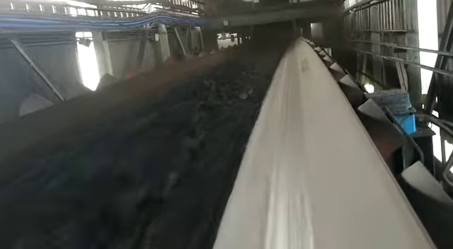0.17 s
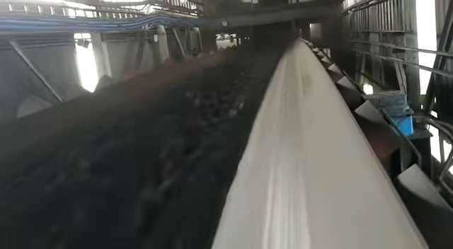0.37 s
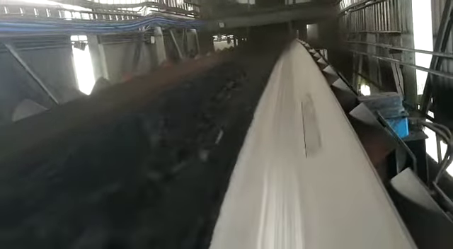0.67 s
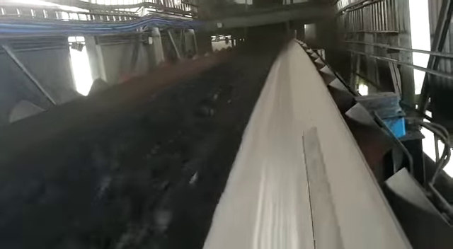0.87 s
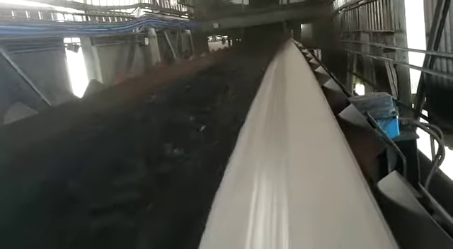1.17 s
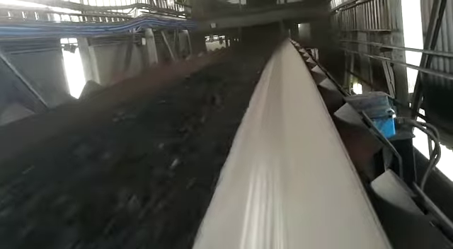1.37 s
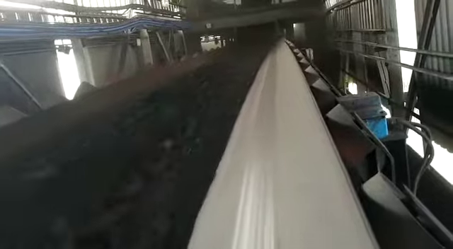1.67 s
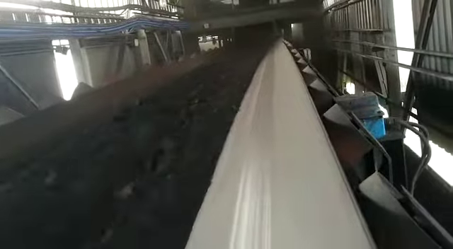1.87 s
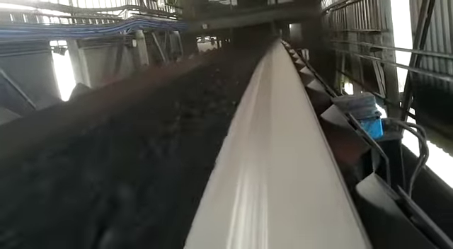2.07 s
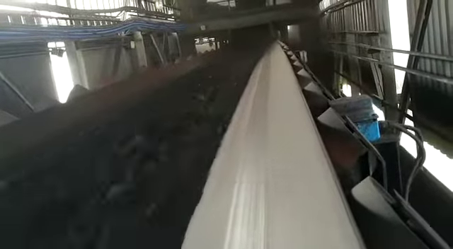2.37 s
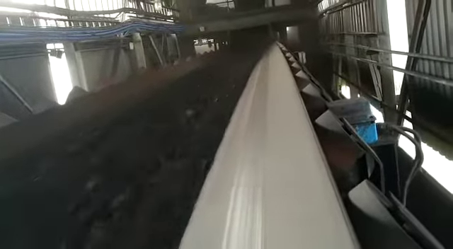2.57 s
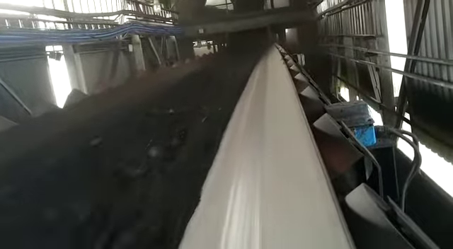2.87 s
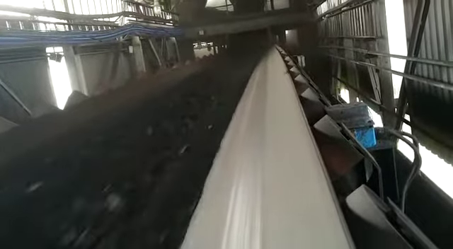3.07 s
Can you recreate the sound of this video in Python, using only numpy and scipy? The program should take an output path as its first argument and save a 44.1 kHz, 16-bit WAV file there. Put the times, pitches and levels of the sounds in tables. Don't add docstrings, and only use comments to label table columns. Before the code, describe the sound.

A dry conveyor roller squeaks in quick regular high chirps over low belt rumble in a steel gallery

```python
import sys
import numpy as np
from scipy import signal
from scipy.io import wavfile
from scipy.ndimage import uniform_filter1d

SR = 44100
rng = np.random.default_rng(int(sys.argv[2]) if len(sys.argv) > 2 else 0)


def volts(x):
    e = np.asarray(x, float) / 20
    return 10 ** e


def int16_out(signal):
    q = np.round(np.clip(np.atleast_2d(signal).T, -1, 1) * 32767)
    wavfile.write(sys.argv[1], SR, q.astype(np.int16))


N = 142002

# frequency in Hz, level in dB per Hz.
RUMBLE_SHAPE = [(12, -47), (20, -29), (81, -4), (177, -2.5), (286, -9), (495, -8), (573, -10),
                (1070, -16.5), (1600, -22), (2080, -35), (3520, -120)]
# frequency in Hz, level in dB per Hz.
HISS_SHAPE = [(1600, -4.5), (2800, 3), (4500, -3), (6800, -8.5), (8300, -45), (9000, -17), (13000, -33),
              (13800, -88)]
# frequency in Hz, likeness from 0 to 1.
STEREO_LIKENESS = [(40, .9998), (80, .999), (170, .99), (350, .75), (700, .56), (1410, 0), (3100, 0)]
# pitch in Hz, level in dB, loudest moment in seconds,
# swell length in seconds, pitch waver in Hz.
DRIVE_HUMS = [(57.2, -39.5, 2.3, 1.6, 0.95), (81.3, -37.5, 2.3, 5.3, 2), (102.6, -30.5, 0.14, 0.6, 2.7),
              (101.8, -31, 2.48, 1.12, 5.5), (121.8, -37, 0.27, 3, 5.57), (144.2, -30, 0.5, 0.35, 6.5),
              (179.2, -25.5, 0.31, 0.7, 5.31), (159.9, -30, 1.82, 1.04, 3.7),
              (193.8, -29.5, 2.28, 2.33, 4.95), (143.2, -35.5, 3, 0.71, 5.94),
              (494.4, -35.5, 0.12, 1.8, 7.4), (489, -33.5, 2.33, 1.28, 8.73), (350.8, -44, 4, 3.9, 14.8)]
# loudest moment in seconds, level in dB, pitch in Hz, length in seconds.
FAR_GROANS = [
    (1.188, -30, 890, 0.033),
    (1.742, -25.5, 922, 0.032),
    (2.114, -29, 976, 0.029),
    (2.682, -27.5, 980, 0.017),
    (3.01, -29.5, 955, 0.04),
    (0.554, -44, 1010, 0.062),
]
# bite in seconds, level in dB, then the 1st, 3rd and 4th partial in dB.
SQUEAKS = [(0.032, -20.0, -10.5, -16.0, -3.0), (0.214, -16.5, -12.0, -14.0, -5.0),
           (0.396, -22.0, -10.5, -15.0, -4.0), (0.578, -19.0, -8.5, -10.0, 4.5),
           (0.763, -14.5, -12.0, -11.5, 0.0), (0.945, -14.5, -13.0, -14.5, -4.5),
           (1.127, -21.5, -13.0, -11.5, -6.0), (1.307, -8.5, -20.5, -14.0, -9.5),
           (1.486, -12.0, -14.5, -11.0, -3.0), (1.672, -18.5, -12.5, -13.5, -4.0),
           (1.856, -19.5, -7.0, -3.0, 2.5), (2.037, -21.0, -7.5, -8.5, -1.0),
           (2.22, -16.5, -15.5, -16.5, -12.0), (2.397, -16.0, -10.0, -6.5, -2.0),
           (2.579, -15.5, -16.5, -15.5, -4.0), (2.764, -21.0, -12.0, -13.0, -7.5),
           (2.949, -20.0, -9.5, -12.5, 2.5), (3.127, -14.5, -16.0, -14.0, -4.0)]
# top partials in dB, pitch in Hz, hold in seconds,
# left over right in dB, roughness from 0 to 1.
SLIPS = [(-39.0, 1900.0, 0.075, 0.0, 0.83), (-29.0, 1895.0, 0.075, 1.0, 0.37),
         (-38.0, 1900.0, 0.065, 0.0, 0.77), (-31.0, 1900.0, 0.065, -2.0, 0.42),
         (-32.0, 1900.0, 0.07, -3.0, 0.45), (-29.0, 1900.0, 0.08, -3.0, 0.48),
         (-35.0, 1900.0, 0.08, 0.0, 0.63), (-26.0, 1902.0, 0.085, -10.0, 0.29),
         (-27.0, 1900.0, 0.085, -3.0, 0.57), (-34.0, 1900.0, 0.07, 2.0, 0.74),
         (-32.0, 1895.0, 0.075, 4.0, 0.59), (-34.0, 1900.0, 0.075, 5.0, 0.79),
         (-35.0, 1900.0, 0.08, 6.0, 0.67), (-26.0, 1875.0, 0.082, 3.0, 0.45),
         (-31.0, 1895.0, 0.08, -0.0, 0.5), (-36.0, 1900.0, 0.08, -3.0, 0.99),
         (-32.0, 1900.0, 0.08, -1.0, 0.58), (-31.0, 1900.0, 0.075, -2.0, 0.54)]
BITE_TIPS = [-56, -45, -51, -37, -40, -47, -44, -38, -38, -45, -41, -50, -44, -38, -42, -49, -42, -49]
LOW_PARTIALS = [5, 0, 13.5, 8]
TOP_PARTIALS = [1, 2.5, 4]
# centre in Hz, width in Hz, level in dB.
RASP_BANDS = [(1940, 300, -39), (3637, 247, 2.5), (5046, 400, -9.5), (5560, 350, -19), (7345, 390, -3.5)]
SHELL_PITCHES = [1800, 1858, 1880, 1950, 3610, 3741, 3807, 3840, 5245, 5566, 5606, 5870, 6165, 7562]
# width in Hz, level in dB.
SHELL_MODES = [(24.4, 25), (16.5, 11.5), (13.3, 8), (40.3, 12), (21.8, -14.5), (20.2, 2), (10.8, 16),
               (14.5, 8), (60, 14), (14.2, 12), (18.5, 5), (50, -0.5), (50.3, 10), (79, -13.5)]
# frequency in Hz, time to fall by 60 dB in seconds.
GALLERY_DECAY = [(1000, .5), (3800, .5), (7500, .42), (9000, .4), (13600, .34), (14400, .05)]

RUMBLE_DB, HISS_DB = -25.5, -37
CLIMB, CLIMB_S, SAG_PER_S = 0.0463, 0.0038, 0.042
WANDER, WANDER_HZ, JITTER, JITTER_HZ = 0.0025, 39.7, 0.029, 384
TOP_STEADY = 0.55
ATTACK_S, RELEASE_S, TIRE_DB_PER_S = 0.012, 0.0016, -66
BITE_S, BITE_RISE_S = 0.016, 0.0069
DRAG_DB, TOP_FADE_DB_PER_S = -18, -190
FLUTTER_DB, FLUTTER_HZ = 4, 80.6
SCRAPE_DB, TIP_S, GRIT_DB = -3.5, 0.0045, -6
DRY_DB, WET_DB, ROLLER_DB = -3, 0, -10.5
EARLY_DB, EARLY_T60_S, FRAME_TOP_HZ = 13, 0.09, 14200
EAR_LAG = 11


def evened(x):
    return x / np.sqrt(np.mean(x ** 2) + 1e-20)


def read(points, hz):
    f, value = np.transpose(points)
    return np.interp(np.log(hz + 1), np.log(f + 1), value)


def resonate(x, hz, width):
    turn = np.exp(2j * np.pi * hz * np.arange(x.shape[-1]) / SR)
    r = np.exp(-np.pi * abs(width) / SR)
    return 2 * (turn * signal.lfilter([1 - r], [1, -r], x / turn)).real


def drift(noise, rate_hz):
    r = np.exp(-2 * np.pi * rate_hz / SR)
    once = signal.lfilter([1 - r], [1, -r], noise)
    return evened(signal.lfilter([1 - r], [1, -r], once))


def wash(shape, level_db, patchy_db, swell_db):
    frames, hz = N // 512 + 5, np.fft.rfftfreq(2048, 1 / SR)
    a, b, c, d, patches = rng.standard_normal((frames, 1025, 5)).T
    swell = evened(uniform_filter1d(patches[0], size=12))
    patches = uniform_filter1d(patches, size=16, axis=0)
    patches = evened(uniform_filter1d(patches, size=6, axis=1))
    same = np.clip(read(STEREO_LIKENESS, hz), -1, 1)[:, None]
    left = a + 1j * b
    right = same * left + np.sqrt(1 - same ** 2) * (c + 1j * d)
    inside = (hz >= shape[0][0]) & (hz < shape[-1][0])
    gain = inside[:, None] * volts(read(shape, hz)[:, None] + patchy_db * patches + swell_db * swell)
    noise = signal.istft(np.array([left, right]) * gain, nperseg=2048, noverlap=1536)[1]
    return volts(level_db) * evened(noise[:, :N])


def belt_rumble():
    return wash(RUMBLE_SHAPE, RUMBLE_DB, patchy_db=1.0, swell_db=0.85)


def belt_hiss():
    return wash(HISS_SHAPE, HISS_DB, patchy_db=0.0, swell_db=2.0)


def drive_hums():
    t, out = np.arange(N) / SR, np.zeros((2, N))
    for hz, db, at, lasting, width in DRIVE_HUMS:
        wobble, throb, other = rng.standard_normal((3, N))
        turns = np.cumsum(hz + width * drift(wobble, rate_hz=5.84)) / SR
        apart = (hz / 800) ** 3 * drift(other, rate_hz=1.7)
        throb_db = (1 + hz / 200) * drift(throb, rate_hz=9.9)
        swell_db = -6.9 * ((t - at) / lasting) ** 2
        tone = np.sin(2 * np.pi * turns + np.outer([1, -1], apart))
        out += volts(db + 0.5 + throb_db + swell_db) * tone
    return out


def far_groans():
    t, out = np.arange(N) / SR, np.zeros((2, N))
    for at, db, hz, length in FAR_GROANS:
        rough = resonate(resonate(rng.standard_normal((2, N)), hz, 160), hz, 160)
        out += evened(rough) * volts(np.maximum(db - 6 * ((t - at) / length) ** 2, -200))
    return out


def shaft_rasp(scrape):
    rasp = 0
    for hz, width, db in RASP_BANDS:
        rasp = rasp + volts(db) * evened(resonate(resonate(scrape, hz, width), hz, width))
    return rasp


def bite_tip(t, steady, scrape, bite):
    grit = evened(np.diff(scrape, n=3, prepend=np.zeros(3)))
    flick = bite * np.exp(-(np.maximum(t - BITE_S, 0) / TIP_S / 2) ** 2)
    return flick * (np.cos(2 * np.pi * 8 * steady) + volts(GRIT_DB) * grit)


def squeak(level_db, first_db, third_db, fourth_db, top_db, pitch_hz, hold, rough, tip_db):
    t = np.arange(SR // 4) / SR
    wander, jitter, scrape, *flutter = rng.standard_normal((11, len(t)))
    rough = np.clip(rough, 0, 1)
    shake = WANDER * drift(wander, WANDER_HZ) + rough * JITTER * drift(jitter, JITTER_HZ)
    climb = CLIMB / (1 + np.exp((t - BITE_S + 0.0022) / CLIMB_S))
    turns = np.cumsum(pitch_hz * (1 - climb - SAG_PER_S * t + shake)) / SR
    steady = turns - TOP_STEADY * pitch_hz * np.cumsum(shake) / SR

    rise = np.minimum(t / ATTACK_S, 1)
    bite = np.clip((t - BITE_S) / BITE_RISE_S + 1, 0, 1)
    fall = volts(TIRE_DB_PER_S * t) * np.exp(-np.maximum(t - ATTACK_S - hold, 0) / RELEASE_S)
    drag = volts(DRAG_DB) * np.cos(2 * np.pi * t) ** 2

    low_dbs = level_db + np.add(LOW_PARTIALS, [first_db, 0, third_db, fourth_db])
    dbs = list(low_dbs) + list(top_db + np.array(TOP_PARTIALS))
    tone = volts(level_db + SCRAPE_DB) * rough * bite * fall * shaft_rasp(scrape)
    for k, db in enumerate(dbs, 1):
        fade_db = TOP_FADE_DB_PER_S * t * np.clip((k - 2) / 3, 0, 1)
        flutter_db = FLUTTER_DB * drift(flutter[k - 1], FLUTTER_HZ)
        start = rise ** 2 if k < 3 else bite
        envelope = start * (fall + drag * (k < 4))
        phase = turns if k < 5 else steady
        tone = tone + volts(db + fade_db + flutter_db) * envelope * np.cos(2 * np.pi * k * phase)
    return tone + volts(tip_db) * bite_tip(t, steady, scrape, bite)


def shell_ring(slip):
    rung = slip
    for hz, (width, db) in zip(SHELL_PITCHES, SHELL_MODES):
        rung = rung + volts(db) * resonate(slip, hz, width)
    return rung


def gallery(x):
    out, t = np.zeros((2, N)), np.arange(N) / SR
    for k in range(3):
        taps = np.zeros((2, SR // 2))
        at = np.arange(80, SR // 2 - 20, 20) + rng.integers(0, 20, (2, (SR // 2 - 81) // 20))
        np.put_along_axis(taps, at, rng.choice([-1., 1.], at.shape), 1)
        hz, s, z = signal.stft(taps, SR, nperseg=256)
        late = volts(-60 * s / np.maximum(read(GALLERY_DECAY, hz), 0.05)[:, None])
        early = volts(EARLY_DB - 60 * s / EARLY_T60_S) * (hz < FRAME_TOP_HZ)[:, None]
        tail = signal.istft(z * (late + early), SR, nperseg=256)[1]
        share = np.sqrt(2 / 3) * np.cos(np.pi * (0.9 * t + k / 3))
        out += signal.fftconvolve(x * share, tail / np.linalg.norm(tail[0]), axes=1)[:, :N]
    return out


def dry_roller():
    slip = np.zeros((2, N + SR))
    for (s, *levels), (top_db, hz, hold, pan_db, rough), tip_db in zip(SQUEAKS, SLIPS, BITE_TIPS):
        sound = squeak(*levels, top_db, hz, hold, rough, tip_db)
        at = max(round((s - BITE_S) * SR), 0)
        slip[:, at:at + len(sound)] += sound * volts([[pan_db / 2], [-pan_db / 2]])
    rung = shell_ring(slip[:, :N])
    near = np.array([np.roll(rung[0], EAR_LAG), rung[1]])
    return volts(ROLLER_DB) * (volts(DRY_DB) * near + volts(WET_DB) * gallery(rung))


def scene():
    background = belt_rumble() + belt_hiss() + drive_hums() + far_groans()
    return background + dry_roller()


def top_cut(x):
    return signal.sosfilt(signal.butter(12, 15680, fs=SR, output="sos"), x)


def record(dry):
    limited = dry / (1 + (dry / 1.6) ** 4) ** 0.25
    edge = signal.firwin(301, 15600, window=("kaiser", 9), fs=SR)
    return top_cut(signal.oaconvolve(limited, edge[None], "same"))


dry = scene()
out = record(dry)
int16_out(out)
```